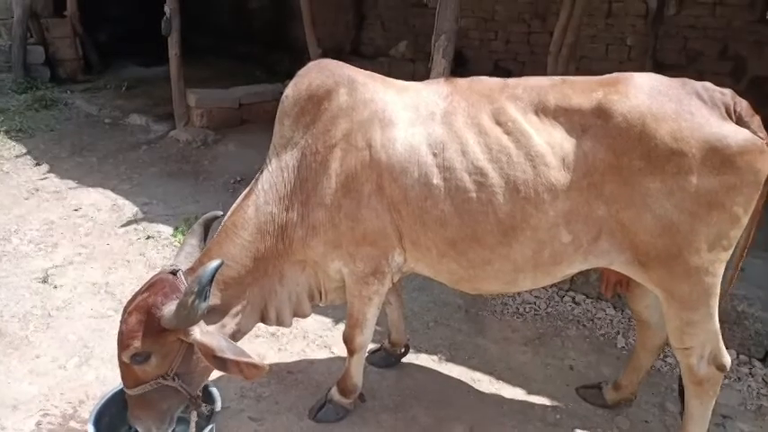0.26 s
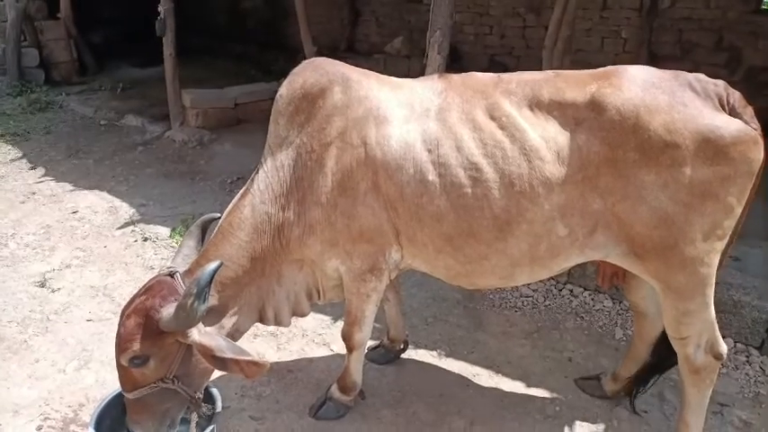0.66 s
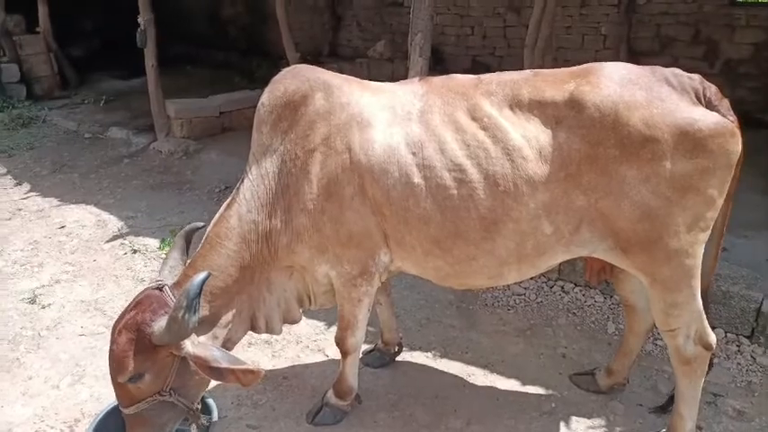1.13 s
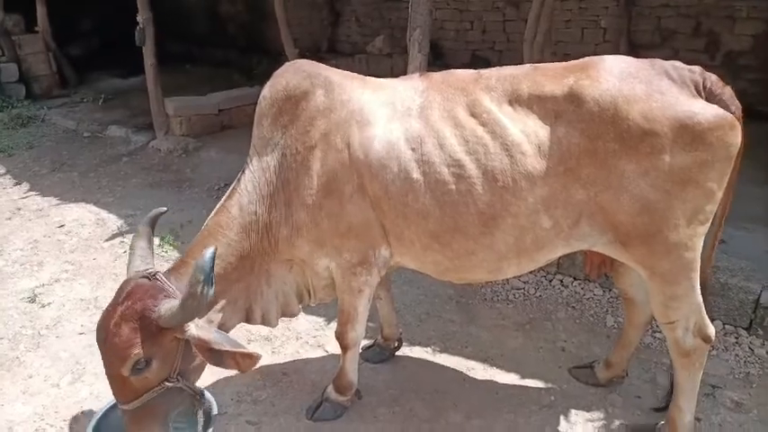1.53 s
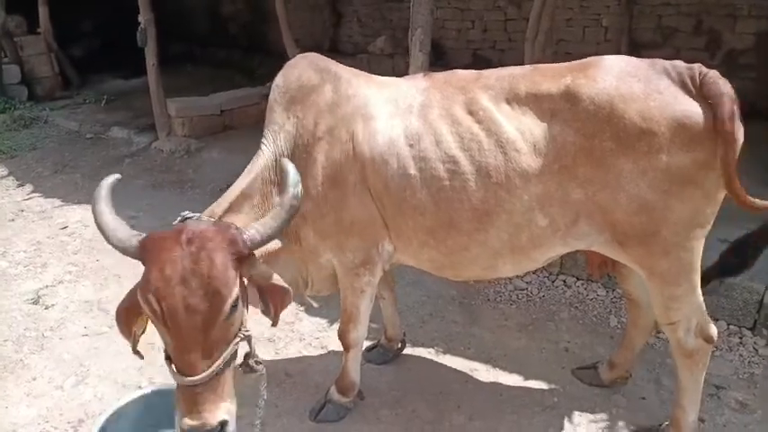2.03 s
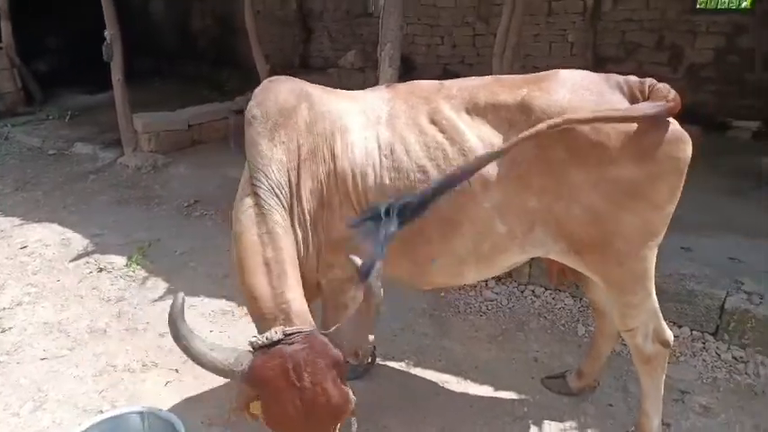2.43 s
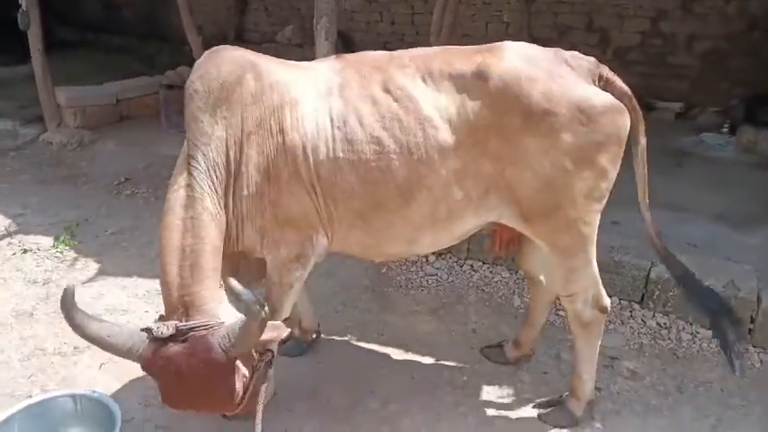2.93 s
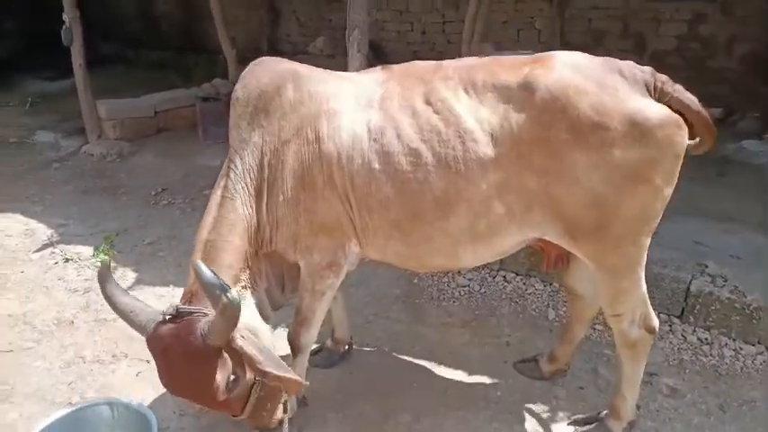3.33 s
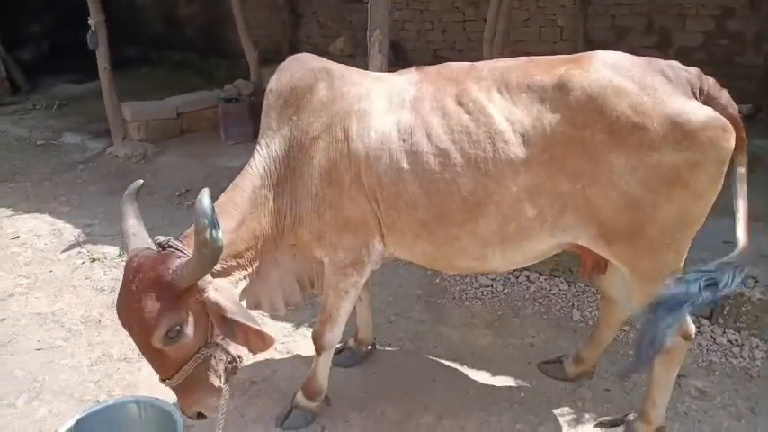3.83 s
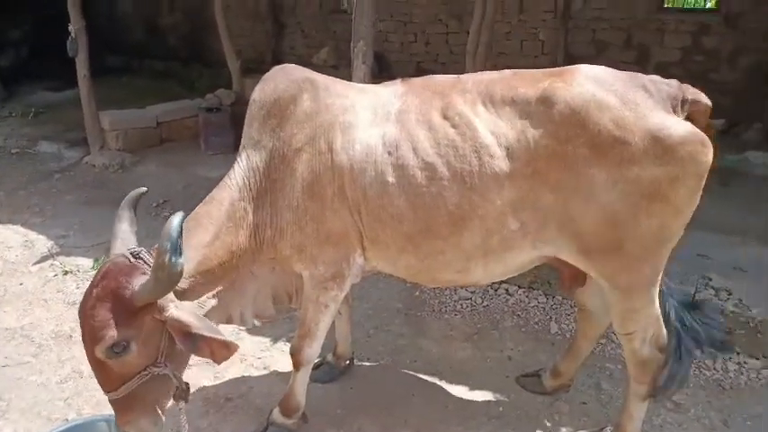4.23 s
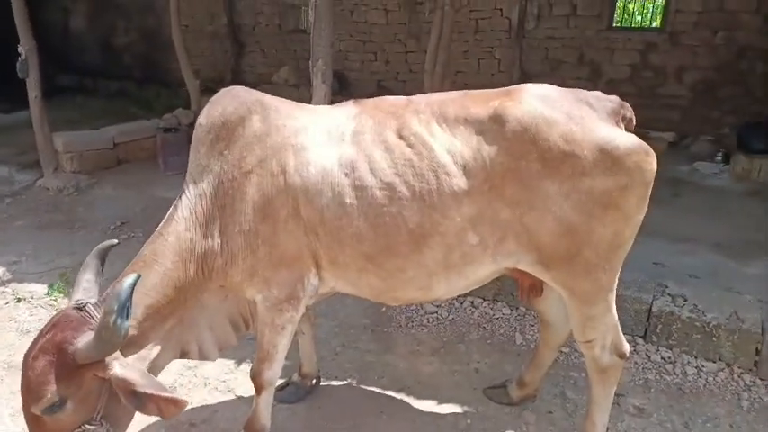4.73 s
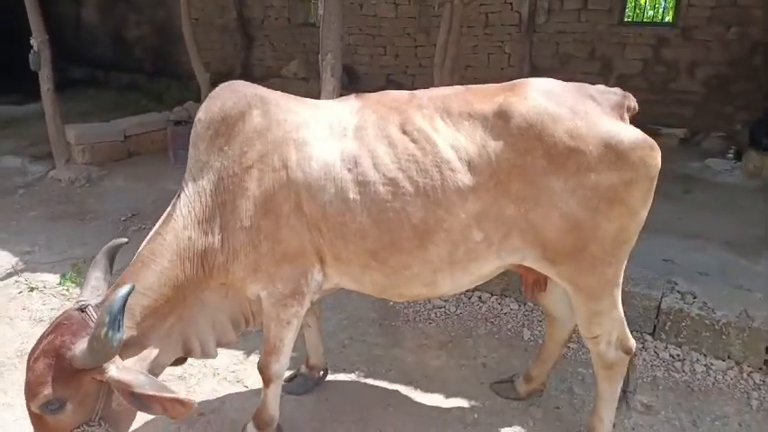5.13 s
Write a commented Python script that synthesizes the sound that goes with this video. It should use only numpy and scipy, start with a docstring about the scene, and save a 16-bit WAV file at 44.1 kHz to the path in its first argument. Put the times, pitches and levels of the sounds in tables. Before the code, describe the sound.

A quiet walled farmyard, close stereo microphone, with a soft airy hush and light low wind buffets. From 0 to 1.5 s a small bird gives six rising, buzzy-ended chirps about 0.3 s apart, blurred by the yard, over very faint level whistles from a far bird in the first half second. Soft low gulps throb from 0.4 s. At 0.82 s the cow's muzzle knocks the steel pail: a bright short clank with a low boom. Water then dribbles and gushes from about 1 to 3 s, bubbly and splashing, with a soft nasal snort near 1.1 s and a cluster of plops and a wet smack at 1.5-1.7 s. Light hoof thuds and scuffs appear around 2.2-3.3 s. Deep thumps come at 3.0, 3.4 and 3.9 s, with a strong gritty hoof step at 3.8 s. Chirps return from 3.5 s to the end; a short sagging squeak sounds at 5.1 s.

```python
"""Cow drinking in a walled farmyard

Close to the microphone a cow drinks from a steel pail: throbbing gulps, wet smacks, a snort through resonant nostrils.
Her muzzle rings the pail wall; water pours as filtered drop trains with bubbles; hooves thud and scuff packed earth.
A small bird sweeps rising chirps in two runs, a far one whistles level notes, and a far squeak comes late.
The yard hushes as coloured noise, and light wind rumbles separately on the two microphone ports.
"""
import sys
import numpy as np
from scipy import signal
from scipy.fft import rfft, irfft, next_fast_len
from scipy.io import wavfile
from scipy.ndimage import map_coordinates

SR = 44100
rng = np.random.default_rng(int(sys.argv[2]) if len(sys.argv) > 2 else 0)


def dump_mix(stems):
    """Bounce the given channels to the path in sys.argv[1] as a 16-bit WAV at rate SR."""
    frames = np.atleast_2d(stems).T  # one column per channel
    limited = np.clip(frames, -1, 1)  # hard clip at full scale
    pcm = np.round(limited * 32767).astype(np.int16)
    wavfile.write(sys.argv[1], SR, pcm)


N = 236323
TIME = np.arange(N) / SR  # s

# still air and far insects in the yard: f/Hz, level/dB
YARD_COLOUR = [(15, -77), (25, 4.5), (69, 0.5), (104, -10.5), (173, -18), (433, -18.5), (648, -26),
               (1530, -28), (2170, -21.5), (2490, -15.5), (3340, -17.5), (5880, -29.5), (7300, -37.5),
               (10100, -33), (15500, -38.5)]
YARD_DB = -56
# wind rumble on the microphone, before a small trim: t/s, level/dB
WIND = [(0.0, -66.5), (0.43, -59.5), (0.76, -54.5), (0.88, -43.5), (1.48, -60.5), (3.0, -54), (3.76, -65),
        (3.88, -42), (4.37, -60), (5.36, -66.5)]
# colour of the wind rumble: f/Hz, level/dB
WIND_COLOUR = [(15, -5), (35, 4.5), (75, -2), (130, -7), (250, -28), (600, -46)]

# one rising chirp, opening note to levelling flick: t from its middle/s (before the sweep speed), f/Hz, level/dB
CHIRP = [(-.095, 2380, -20), (-.07, 2610, -4), (-.045, 2720, -13), (-.02, 3230, -3), (0, 3430, 2),
         (.028, 3820, -1), (.042, 4400, -11), (.058, 5050, -13), (.078, 5130, -19)]
# chirps, before a common trim: t of the middle/s, level/dB, sweep speed after the middle/ratio,
# emphasis of the end over the start/dB
CHIRPS = [(0.036, -51, 1.28, 1.5), (0.328, -49, 1.4, 3.5), (0.617, -47.5, 1.8, 0), (0.944, -47.5, 0.92, 1),
          (1.211, -47.5, 0.89, 2), (1.501, -49.5, 1.2, -9), (3.499, -57, 0.9, 4.5),
          (3.796, -50.5, 0.55, -3.5), (4.114, -50, 1, 4), (4.402, -52, 1.02, 2.5),
          (4.698, -49.5, 0.97, 2.5), (4.997, -49, 0.99, 3), (5.334, -57.5, 1.2, -17)]
CHIRP_OPENING_DB, OPENING_DB_PER_S = -3.5, 1.5  # the opening note gains level as the song goes on
CHIRP_BUZZ, FLICK_BUZZ = 0.013, 0.046  # pitch flutter as a share of the pitch
CHIRP_BLUR_DB, YARD_T60_S = 3, 0.38

# level whistles of a second bird far off: t/s, f/Hz, level/dB
FAR_WHISTLES = [(0.02, 1996, -62), (0.18, 1448, -74), (0.33, 1397, -70.5), (0.471, 1319, -70.5)]
FAR_RISE_S, FAR_T60_S = 0.014, 0.69

# hoof steps and scuffs: t/s, thud level/dB, grit level/dB, rise/s, thud pitch/ratio
STEPS = [(0.119, -40.5, -48, 0.002, 1.67), (2.152, -53, -44.5, 0.011, 0.52),
         (2.277, -47.5, -55.5, 0.0093, 1.31), (2.489, -44, -47, 0.022, 0.71),
         (2.555, -44, -48, 0.0054, 0.8), (3.088, -46.5, -61, 0.007, 0.82), (3.227, -45, -52, 0.0023, 1.07),
         (3.328, -52.5, -56.5, 0.055, 0.99), (3.727, -57.5, -65, 0.0027, 1.48),
         (3.825, -32.5, -32, 0.0062, 1.002), (4.129, -51.5, -62, 0.06, 0.67),
         (4.859, -62, -57, 0.0066, 1.64), (5.126, -52, -61, 0.0043, 1.19)]
# dull thud of a hoof, before the pitch ratio: f/Hz, level/dB
THUD_COLOUR = [(80, -1.5), (170, -3.5), (300, 3.5), (480, -4), (750, -17), (1500, -32), (4000, -50)]
# scuffed grit: f/Hz, level/dB
GRIT_COLOUR = [(300, 0), (700, -13), (1200, 2), (1800, -10.5), (3000, -9.5), (4500, -17), (7000, -29),
               (11000, -38), (15000, -46)]
# resonances of a hoof on the ground, before the thud's pitch ratio: f/Hz, width/Hz, boost/dB
HOOF = [(172, 13.3, 13), (344, 25, 8.5), (463, 33, 8), (1150, 1000, 3)]
STEP_T60_S, DRAG_T60_PER_RISE = 0.19, 3.6  # a hoof set down slowly also drags on for longer
GRIT_LAG_S = 0.004  # the grit crunches just after the thud

# wet smacks, splats and splash onsets: t/s, level/dB, centre f/Hz
SMACKS = [(0.27, -52, 6550), (0.335, -62.5, 5960), (0.757, -51.5, 4800), (0.982, -49, 7560),
          (1.66, -35, 5260), (1.726, -42.5, 3270), (1.958, -47, 3450), (2.155, -44.5, 2820),
          (2.369, -42, 8240), (3.233, -45, 2350), (3.58, -55, 2440), (3.703, -49.5, 2250)]
# colour under every wet burst: f/Hz, level/dB
WET_COLOUR = [(200, -2), (5000, 8), (7000, 3), (11000, 15), (15000, 10)]
SMACK_OCTAVES, SMACK_RISE_S, SMACK_T60_S = 0.46, 0.01, 0.2

# gulps and other soft low thumps: t/s, f/Hz, peak level/dB, t60/s
GULPS = [(0.408, 81, -47, 0.25), (0.597, 116.5, -42.5, 0.12), (0.707, 101.3, -42, 0.12),
         (0.991, 39.9, -42.5, 0.81), (2.291, 72.7, -51.5, 0.96), (3.011, 90, -34.5, 0.064),
         (3.395, 72.5, -31, 0.38), (3.879, 70.4, -31, 0.11), (3.963, 53.6, -34, 0.1),
         (4.233, 63.5, -41.5, 0.15), (4.482, 53.6, -44.5, .15)]
GULP_RISE_S, GULP_RISE_PER_T60 = 0.0068, 0.059  # longer throbs build up more slowly

# single big drops plopping into the pail: t/s, level/dB, cavity f/Hz
DROPS = [(0.429, -52, 2510), (1.489, -32.5, 3320), (1.574, -31.5, 2090), (1.62, -31.5, 2660),
         (1.6581, -27, 2430), (3.94, -40.5, 1970), (3.942, -44, 2800)]
DROP_OCTAVES, DROP_RISE_S, DROP_T60_S = 0.12, 0.0012, 0.074
# tick of a drop's impact: level for the biggest drop, and dB lost per dB of a smaller one
TICK_DB, TICK_GROWTH, TICK_HZ, TICK_OCTAVES, TICK_T60_S = -20, 3.1, 4870, 0.31, 0.018

# muzzle bumps on the pail: t/s, level/dB, brightness/dB, low boom level/dB
BUMPS = [(0.464, -46, -41, -44), (0.545, -47.5, -69, -71), (0.821, -34, 19, -50), (0.824, -25, -1, -24.5)]
# modes of the pail wall: f/Hz, level/dB, t60/s
PAIL_MODES = [(122, -29, 0.27), (159.4, -11, 0.24), (227, -6.5, 0.13), (287, -8, 0.24), (460, -14.5, 0.3),
              (557, -9, 0.1), (640, -15, 0.19), (1050, -12, 0.19), (1450, -16.5, 0.18), (1850, -12, 0.17),
              (2440, -15, 0.047), (2550, -5, 0.045), (3340, -22, 0.052), (3580, -18, 0.17)]
# water jolted in the pail: f/Hz, level/dB
SLOSH_COLOUR = [(59, -21), (100, 1.5), (162, -11.5), (274, -8), (391, -8), (462, -7.5), (849, -16.5),
                (1050, -17.5), (1210, -16), (3320, -14.5), (4000, -30.5), (10700, -44.5), (15000, -50)]

# gushes from the muzzle, before the splash and spray gains: t/s, splash into the pail level/dB,
# fine spray level/dB, hold/s, t60/s
GUSHES = [(1.171, -45, -49.5, 0.043, 0.95), (1.318, -38, -44.5, .02, 0.44),
          (1.452, -39.5, -50.5, 0.075, 0.65), (1.543, -50, -47.5, 0.084, 0.98),
          (1.769, -44, -57, .09, 0.28), (1.952, -34.5, -45, 0.091, 0.21), (2.143, -39, -53, 0.011, 0.4),
          (2.36, -47.5, -48.5, 0.011, .35), (2.408, -37.5, -40.5, 0.1, 0.29), (2.612, -38.5, -43, 0.027, 1),
          (2.825, -40, -43, 0.022, 0.33), (2.942, -48.5, -44.5, 0.0033, 0.35),
          (3.065, -45.5, -54, .005, 0.16)]
GUSH_RISE_S, GUSH_RISE_PER_HOLD = 0.019, 0.19  # longer gushes build up more slowly
# a thin dribble runs under the gushes, its levels before the same gains
DRIBBLE_START_S, DRIBBLE_END_S, DRIBBLE_FADE_S = 0.94, 2.28, 0.084
DRIBBLE_SPLASH_DB, DRIBBLE_SPRAY_DB = -50, -63.5
# splash into the pail: f/Hz, level/dB
SPLASH_COLOUR = [(200, -43), (450, -7), (800, -20), (1300, -1), (1900, 4), (2700, 6), (3900, 3.5),
                 (5200, -3.5), (7000, -8), (10000, -15), (15000, -10.5)]
# fine spray: f/Hz, level/dB
SPRAY_COLOUR = [(2000, -15.5), (5000, -0.5), (7000, -7.5), (8500, -4.5), (10500, -4), (13000, -7),
                (15500, -15.5)]
# ring of the pail under the splash: f/Hz, width/Hz, boost/dB
HOLLOW = [(2390, 17, 10), (2570, 30, 9.5), (3280, 310, 8), (4740, 68, -1)]

# snort through the nose into the pail: f/Hz, level/dB
SNORT_COLOUR = [(80, -27), (170, -2.5), (350, -4.5), (900, -18), (1500, -2.5), (3000, -19), (5000, -17)]
# resonances of the nostrils: f/Hz, width/Hz, boost/dB
NOSE = [(360, 120, 10.5), (695, 175, 16.5), (1098, 84, 17), (1560, 150, 2)]
SNORT_AT_S, SNORT_DB, SNORT_RISE_S, SNORT_HOLD_S, SNORT_T60_S = 1.1, -45.5, 0.1, 0.06, 0.85

# a short far squeak scoops up to its pitch, then sags
SQUEAK_AT_S, SQUEAK_DB, SQUEAK_RISE_S, SQUEAK_HOLD_S, SQUEAK_T60_S = 5.074, -48.5, 0.0095, 0.032, 0.17
SQUEAK_HZ, SQUEAK_SAG_HZ_PER_S, SQUEAK_SCOOP_HZ, SQUEAK_SCOOP_S = 1209, 1770, 403, 0.0067
SQUEAK_OVERTONE_DB, OVERTONE_RISE_S, OVERTONE_T60_S = 6.5, 0.027, 0.025  # it flares near the start

# likeness of the two channels: f/Hz, left-right correlation/ratio
LIKENESS = [(25, -0.27), (60, 1), (120, 1), (350, 0.95), (800, 0.33), (1400, 0.11), (4000, -0.14),
            (6000, 0.56), (7200, -0.41), (8200, 0.35), (9600, 1), (12500, 0.93), (14500, -0.33)]
# microphone ports: f/Hz, left minus right level/dB
PORTS = [(100, -0.5), (800, -0.5), (1400, 3), (2300, 11), (3200, 13.5), (4300, 8.5), (5800, 10.5),
         (7300, -5), (8300, -5), (9200, -12.5), (10500, 4.5), (12800, 0.5), (14500, 20)]
CUTOFF_HZ = 15700


def from_db(db):
    """Decibels to amplitude gain."""
    return np.exp(np.asarray(db) * np.log(10) / 20)


def rms_one(x):
    """Scale to unit power."""
    return x / np.sqrt(np.mean(x ** 2) + 1e-20)


def in_time(rows, t=TIME):
    """Each column of a curve, read at the times t."""
    s, *columns = np.transpose(rows)
    return [np.interp(t, s, column) for column in columns]


def at_hz(points, hz):
    """Read a spectrum on a log-frequency axis."""
    f, value = np.transpose(points)
    return np.interp(np.log(hz + 1), np.log(f), value)


def bins(size):
    """Frequencies of a real transform."""
    return np.arange(size // 2 + 1) * SR / size


def coloured(spectrum, extra_db=lambda hz: 0, source=None, size=N):
    """Two unrelated signals (white noise by default) become a coloured stereo pair of unit power."""
    length = next_fast_len(size)
    hz = bins(length)
    if source is None:
        source = rng.standard_normal((2, size))
    mid, side = rfft(source, length)
    alike = np.clip(at_hz(LIKENESS, hz), -.98, .98)
    pair = np.sqrt(1 + alike) * mid + np.sqrt(1 - alike) * side * [[1], [-1]]
    gain = from_db(at_hz(spectrum, hz) + extra_db(hz))
    return rms_one(irfft(pair * gain, length)[:, :size])


def resonances(table):
    """The boost in dB, by frequency, of a set of resonances."""
    return lambda hz: sum(db / (1 + (2 * (hz - f) / width) ** 2) for f, width, db in table)


def drift(rate, size=N):
    """Random wandering of unit power, with 2 * rate knots a second."""
    position = TIME[:size] * rate * 2
    knots = rng.standard_normal(4000)
    return rms_one(np.interp(position, np.arange(len(knots)), knots))


def mottled(x, depth_db, patch_hz=170, patch_s=.025):
    """An uneven, shifting colour: small patches of time and pitch swell and fade."""
    hz, t, cells = signal.stft(x, SR, nperseg=512)
    rows, columns = np.meshgrid(hz / patch_hz, t / patch_s, indexing="ij")
    patches = map_coordinates(rng.standard_normal((400, 700)), [rows, columns], order=1)
    return rms_one(signal.istft(cells * from_db(depth_db * patches), SR)[1][:, :N])


def swell(rise, t60, hold=0):
    """One second of envelope: a rise, a hold, then an exponential decay."""
    t = TIME[:SR]
    return np.minimum(t / max(rise, 1e-4), 1) * from_db(-60 * np.maximum(t - rise - hold, 0) / t60)


def tone(hz):
    """One second of a sine."""
    return np.sin(2 * np.pi * hz * TIME[:SR])


def add(out, s, sound):
    """Mix a sound in at time s."""
    start = max(round(s * SR), 0)
    out[:, start:start + sound.shape[-1]] += sound[..., :N - start]


def walls(x, wet_db, t60):
    """The direct sound plus its scattered echoes from the yard walls and the shed, as decaying noise."""
    tail = coloured([(50, -15), (5000, -6), (15000, -10)], size=SR) * swell(0.0037, t60)
    tail = rms_one(tail) / np.sqrt(SR)  # unit energy
    return x + from_db(wet_db) * signal.fftconvolve(x, tail, axes=1)[:, :N]


def air(wind_db=1.0, lump_db=2.0):
    """The yard's soft hush, and light wind that buffets each microphone port separately."""
    gust_db, = in_time(WIND)
    hush = from_db(YARD_DB) * mottled(coloured(YARD_COLOUR), depth_db=5.0)
    buffets = np.array([coloured(WIND_COLOUR)[port] * from_db(lump_db * drift(13)) for port in range(2)])
    return hush + from_db(gust_db + wind_db) * buffets


def bird(flutter_db=2.5, gain_db=-1.77, size=SR // 3):
    """A whistle that opens softly and turns buzzy as it sweeps upward."""
    out = np.zeros((2, N))
    for s, db, speed, end_db in CHIRPS:
        t = TIME[:size] - min(s, .11)
        progress = np.where(t > 0, t * speed, t)  # only the second half is sped or slowed
        hz, shape_db = in_time(CHIRP, progress)
        buzz = np.interp(progress, [.01, .035, .05, .06], [CHIRP_BUZZ, FLICK_BUZZ, FLICK_BUZZ, CHIRP_BUZZ])
        hz = hz * (1 + buzz * drift(350, size=size))
        opening_db = CHIRP_OPENING_DB + OPENING_DB_PER_S * s - end_db / 2
        emphasis_db = np.interp(progress, [-.05, -.02, .01, .04], [opening_db, 0, 0, end_db])
        level = gain_db + db + shape_db + emphasis_db + flutter_db * drift(71.6, size=size)
        sounding = (progress > CHIRP[0][0]) & (progress < CHIRP[-1][0])
        whistle = np.sin(2 * np.pi * np.cumsum(hz) / SR)
        add(out, s + t[0], sounding * from_db(level) * whistle)
    return walls(out, wet_db=CHIRP_BLUR_DB, t60=YARD_T60_S)


def far_bird(waver=0.022):
    """Faint level whistles with a wavering pitch, blurred by distance."""
    out = np.zeros((2, N))
    for s, hz, db in FAR_WHISTLES:
        phase = 2 * np.pi * np.cumsum(hz * (1 + waver * drift(147.5, size=SR))) / SR
        add(out, s, from_db(db) * np.sin(phase) * swell(FAR_RISE_S, FAR_T60_S))
    return walls(out, wet_db=3.0, t60=0.22)


def hooves(size=SR // 2):
    """A hoof gives a dull resonant thud, at its own pitch each step, and scuffs the grit."""
    out, ring = np.zeros((2, N)), resonances(HOOF)
    for s, thud_db, grit_db, rise, ratio in STEPS:
        shifted = np.array(THUD_COLOUR) * [ratio, 1]
        thud = from_db(thud_db) * coloured(shifted, lambda hz: ring(hz / ratio), size=size)
        grit = from_db(grit_db) * coloured(GRIT_COLOUR, ring, size=size)
        weight = swell(rise, STEP_T60_S + DRAG_T60_PER_RISE * rise)[:size]
        add(out, s, thud * weight)
        add(out, s + GRIT_LAG_S, grit * weight)
    return out


def wet_burst(centre, octaves, rise, t60, size=SR // 3):
    """A small wet noise burst gathered around a centre pitch."""
    peak = lambda hz: -20 * np.log10(1 + (np.log2((hz + 1) / centre) / octaves) ** 2)
    return coloured(WET_COLOUR, peak, size=size) * swell(rise, t60)[:size]


def smacks():
    """Smacks and splats of water in broad wet bursts, echoed by the yard."""
    out = np.zeros((2, N))
    for s, db, centre in SMACKS:
        add(out, s, from_db(db) * wet_burst(centre, SMACK_OCTAVES, SMACK_RISE_S, SMACK_T60_S))
    return walls(out, wet_db=-17.5, t60=0.43)


def gulps():
    """Low, decaying sine throbs."""
    out = np.zeros((2, N))
    for s, hz, db, t60 in GULPS:
        add(out, s, from_db(db) * tone(hz) * swell(GULP_RISE_S + GULP_RISE_PER_T60 * t60, t60))
    return out


def drops():
    """A big drop ticks on impact and rings its narrow cavity."""
    out, biggest_db = np.zeros((2, N)), max(db for _, db, _ in DROPS)
    for s, db, centre in DROPS:
        tick_db = TICK_DB + TICK_GROWTH * (db - biggest_db)
        tick = from_db(tick_db) * wet_burst(TICK_HZ, TICK_OCTAVES, 0.00024, TICK_T60_S)
        plop = from_db(db) * wet_burst(centre, DROP_OCTAVES, DROP_RISE_S, DROP_T60_S)
        add(out, s, tick + plop)
    return walls(out, wet_db=-17.5, t60=0.43)


def pail(boom_hz=76, boom_t60=0.32, ring_db=-3.0, slosh_db=-2):
    """Each bump rings the wall, jolts the water and makes the loaded bottom boom."""
    out = np.zeros((2, N))
    for s, db, bright_db, boom_db in BUMPS:
        tilt = lambda hz: bright_db * hz ** 2 / (hz ** 2 + 1500 ** 2)
        ring = 0
        for hz, level, t60 in PAIL_MODES:
            ring = ring + from_db(level + tilt(hz)) * rng.choice([-1, 1]) * tone(hz) * swell(0.0015, t60)
        jolt = swell(0.00062, 0.02) + from_db(0.5) * swell(0.0013, 0.21)
        slosh = coloured(SLOSH_COLOUR, tilt, size=SR) * jolt
        boom = from_db(boom_db) * tone(boom_hz) * swell(0.019, boom_t60)
        add(out, s, from_db(db) * (from_db(ring_db) * ring + from_db(slosh_db) * slosh) + boom)
    return out


def flow():
    """Strength of splash and spray: each gush rises, holds and drains away, over a thin dribble."""
    fade = np.minimum(TIME - DRIBBLE_START_S, DRIBBLE_END_S - TIME) / DRIBBLE_FADE_S
    dribble = np.clip(fade, 0, 1)
    power = (from_db([[DRIBBLE_SPLASH_DB], [DRIBBLE_SPRAY_DB]]) * dribble) ** 2
    for s, splash_db, spray_db, hold, t60 in GUSHES:
        gush = swell(GUSH_RISE_S + GUSH_RISE_PER_HOLD * hold, t60, hold)
        add(power, s, (from_db([[splash_db], [spray_db]]) * gush) ** 2)
    return np.sqrt(power)


def droplets(per_s, spread_db):
    """Random impacts of varying size, as two trains."""
    sizes = from_db(spread_db * np.minimum(rng.exponential(1, (2, N)), 4)) * rng.standard_normal((2, N))
    return sizes * (rng.random((2, N)) < per_s / SR)


def bubbles(low_hz=1900, high_hz=5400, cycles=130, size_db=1.0, count=1300):
    """Small trapped bubbles, each ringing briefly at its own, slightly rising pitch."""
    out, t = np.zeros((2, N + SR)), TIME[:SR // 20]
    for when, pitch, size, left, right in rng.random((count, 5)):
        hz = low_hz * (high_hz / low_hz) ** pitch
        phase = 2 * np.pi * (hz * t * (1 + 0.54 * t) + np.array([[left], [right]]))
        # middle pitches ring loudest
        height = from_db(size_db * min(-np.log(size), 3) - 16 * abs(pitch - .45))
        envelope = np.minimum(t / 0.0029, 1) * from_db(-60 * t * hz / cycles)
        start = int(when * N)
        out[:, start:start + len(t)] += height * np.sin(phase) * envelope
    return rms_one(out[:, :N])


def water(clump_db=1.04, splash_gain_db=-3.0, spray_gain_db=2.63, spit_db=-9):
    """Dense drops splash in the ringing pail amid bubbles and fine spray; sparser big drops spit."""
    splashing, spraying = flow()
    plinks = from_db(-5) * bubbles()
    splash = mottled(coloured(SPLASH_COLOUR, resonances(HOLLOW), droplets(4000, 3.15)) + plinks, depth_db=4.0)
    spray = mottled(coloured(SPRAY_COLOUR, source=droplets(9000, 0.31)), depth_db=4.5)
    spit_colour = [(900, -44), (2500, 15.5), (5500, 8), (12000, -3)]
    big_drops = from_db(spit_db) * coloured(spit_colour, source=droplets(120, 0.33))
    pouring = from_db(splash_gain_db) * splashing * (splash + big_drops)
    wet = pouring + from_db(spray_gain_db) * spraying * spray
    return walls(wet * from_db(clump_db * drift(60)), wet_db=-9, t60=0.081)


def snort():
    """Air rushes through the cow's wet nostrils and sounds their resonances."""
    out = np.zeros((2, N))
    blowing = from_db(SNORT_DB) * swell(SNORT_RISE_S, SNORT_T60_S, SNORT_HOLD_S)
    add(out, SNORT_AT_S, blowing * coloured(SNORT_COLOUR, resonances(NOSE), size=SR))
    return out


def squeak(rough=0.031, rasp_db=-5):
    """A brief unsteady tone with an overtone and a resonant rasp of noise."""
    out, t = np.zeros((2, N)), TIME[:SR]
    hz = SQUEAK_HZ - SQUEAK_SAG_HZ_PER_S * t - SQUEAK_SCOOP_HZ * np.exp(-t / SQUEAK_SCOOP_S)
    phase = 2 * np.pi * np.cumsum(hz * (1 + rough * drift(250, size=SR))) / SR
    rasp_ring = resonances([(800, 190, 19), (1910, 200, 20), (3000, 370, 30)])
    rasp = coloured([(300, -10), (800, -2.0), (3200, -13), (5000, -13)], rasp_ring, size=SR)
    overtone = from_db(SQUEAK_OVERTONE_DB) * swell(OVERTONE_RISE_S, OVERTONE_T60_S)
    sound = np.sin(phase) + overtone * np.sin(2 * phase) + from_db(rasp_db) * rasp
    add(out, SQUEAK_AT_S, from_db(SQUEAK_DB) * sound * swell(SQUEAK_RISE_S, SQUEAK_T60_S, SQUEAK_HOLD_S))
    return walls(out, wet_db=-5.5, t60=0.17)


def scene():
    """Everything in the yard: the cow, the birds, the squeak and the air."""
    cow = hooves() + smacks() + gulps() + drops() + pail() + water() + snort()
    return air() + bird() + far_bird() + cow + squeak()


def record(dry):
    """The two microphone ports colour the sound differently; the top is cut steeply."""
    length = next_fast_len(N + SR)
    hz = bins(length)
    ports = from_db(at_hz(PORTS, hz) * np.array([[.5], [-.5]]))
    ports = ports / np.sqrt(np.mean(ports ** 2, axis=0))  # same total power at every pitch
    low_pass = 1 / np.sqrt(1 + (hz / CUTOFF_HZ) ** 700)
    return irfft(rfft(dry, length) * ports * low_pass, length)[:, :N]


dry = scene()
out = record(dry)
dump_mix(out)
```